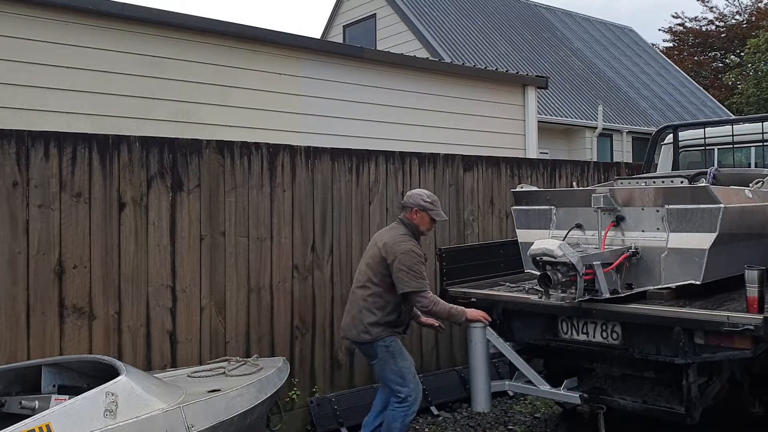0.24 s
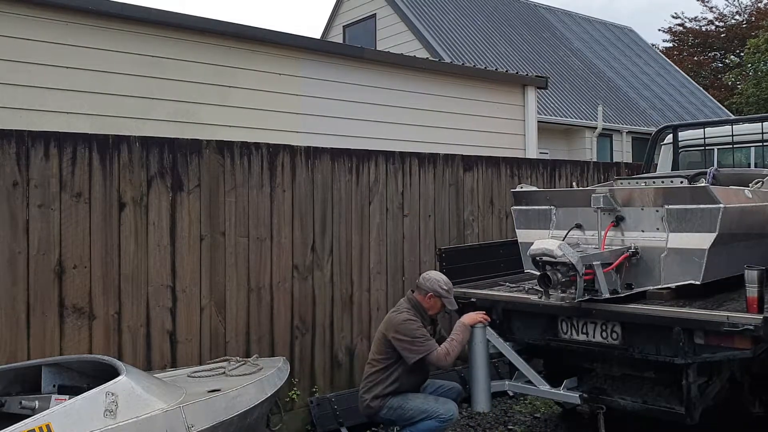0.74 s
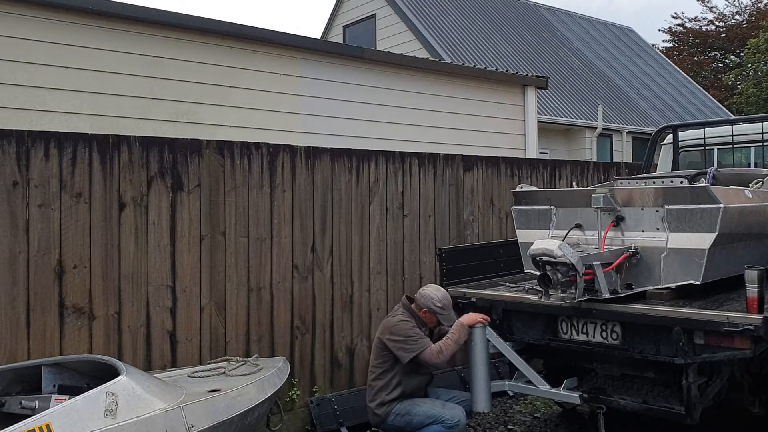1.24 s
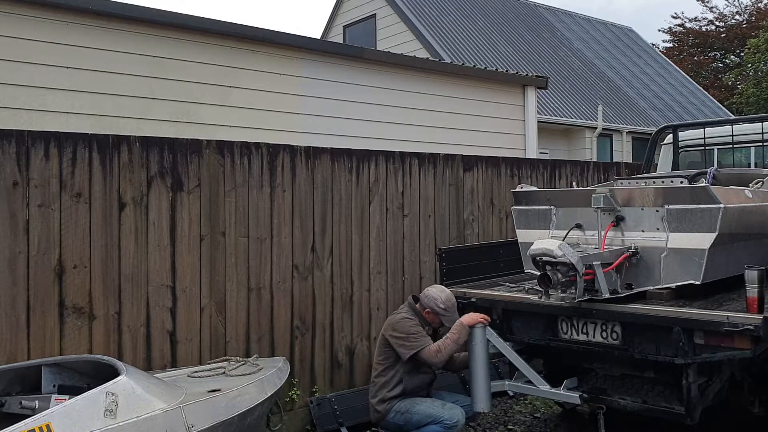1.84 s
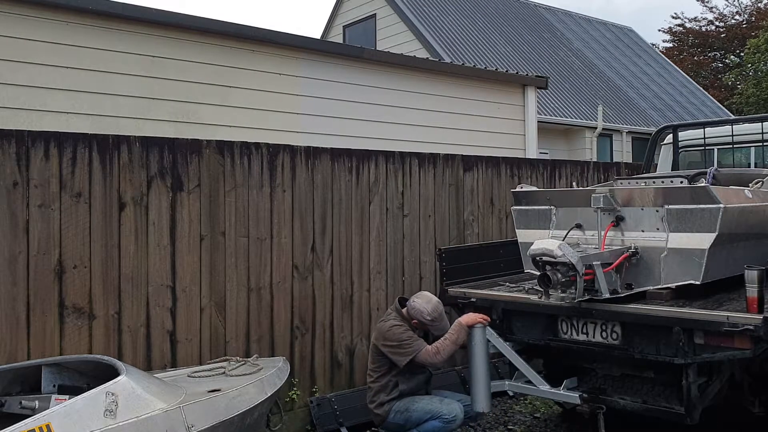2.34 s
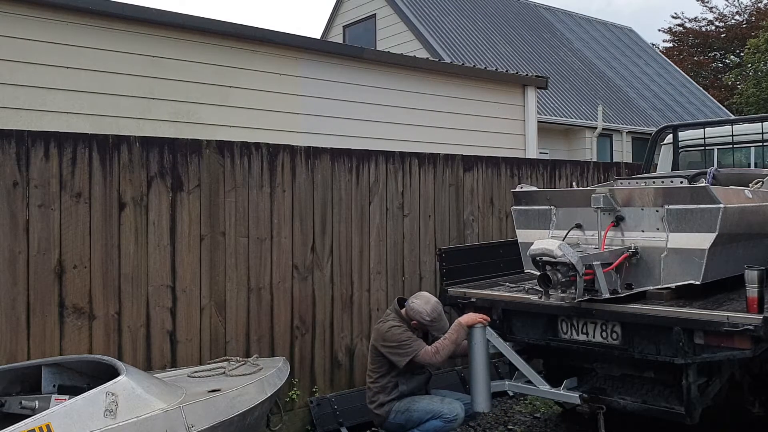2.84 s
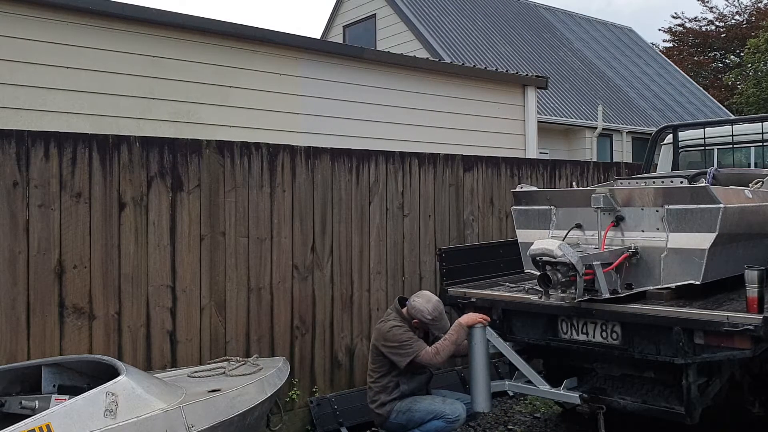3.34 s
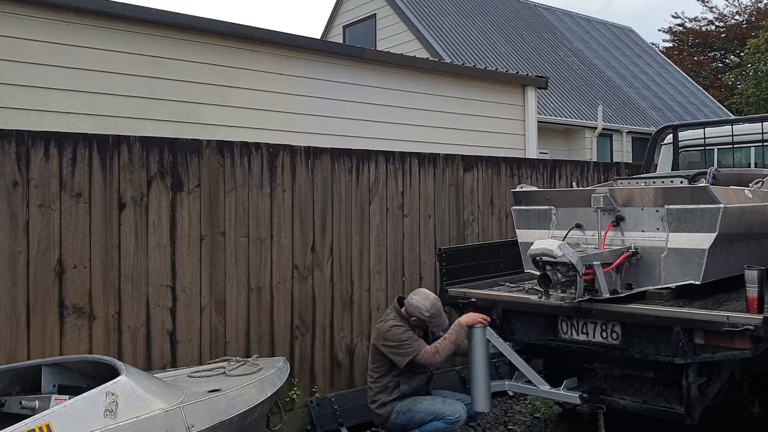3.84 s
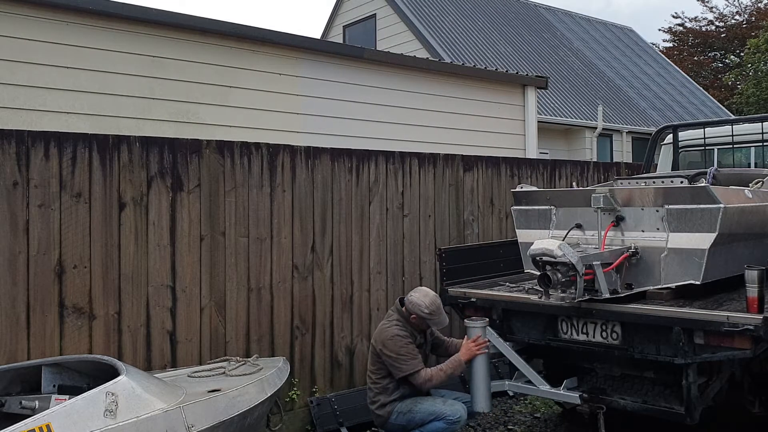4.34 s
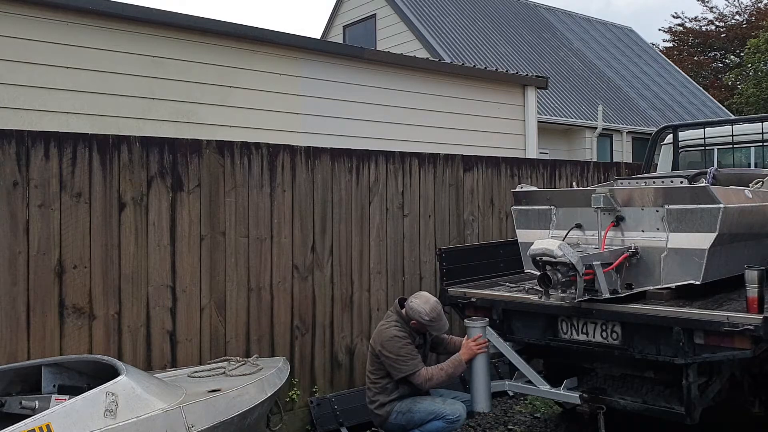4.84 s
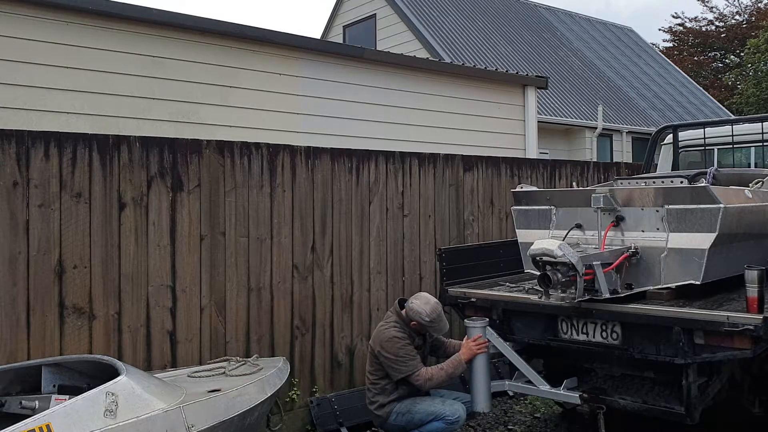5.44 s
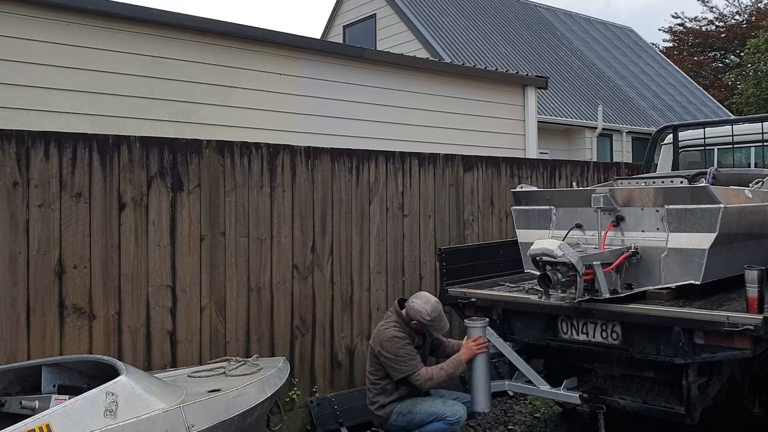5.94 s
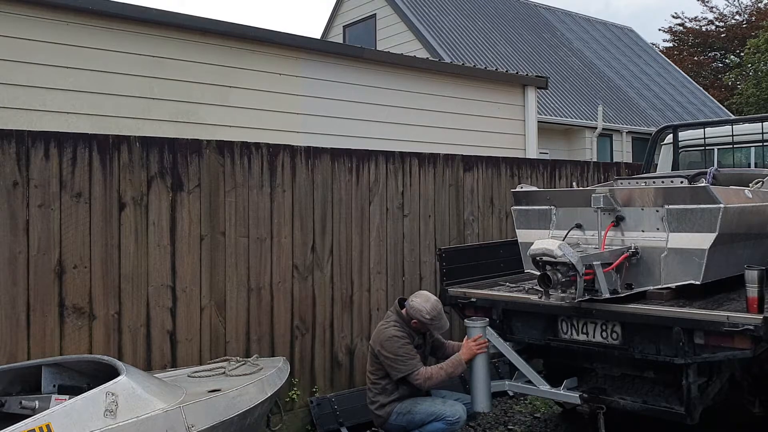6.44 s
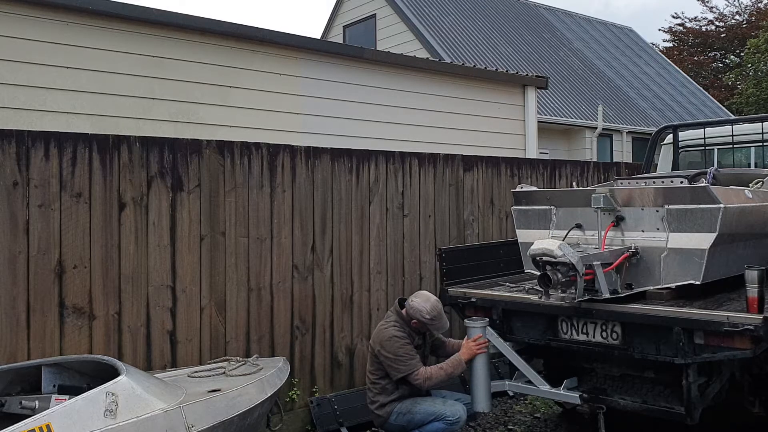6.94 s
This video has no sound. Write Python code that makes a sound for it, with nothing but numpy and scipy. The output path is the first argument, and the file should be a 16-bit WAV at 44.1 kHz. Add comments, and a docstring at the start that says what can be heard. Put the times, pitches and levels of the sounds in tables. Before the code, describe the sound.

Gravel crunches and small stones click as someone settles beside a steel post. Faint rubbing follows, then very short, high, glassy metal squeals, first irregular and spaced out, soon regular as the post is worked to and fro. Low muffled knocking and a little gritty scrape swell with each push. The microphone stands some metres away outdoors; fence and vehicle return quick echoes over soft low rumble.

```python
"""The dry joint of a home-built crane squeals in stick-slip as a man works its steel post to and fro by hand.
Squeals: chattering partials; judder: random knocks ringing post modes, plus scraping grit.
Clanks are damped sines, rubs narrow noise bands, sleeves and gravel coloured grains, footfalls damped noise.
Ground, a wooden fence and a truck throw the squeals back; a quiet outdoor rumble lies under it all."""
import sys
import numpy as np
from scipy import signal
from scipy.fft import rfft, irfft, next_fast_len
from scipy.io import wavfile
from scipy.ndimage import uniform_filter1d

SR = 44100
rng = np.random.default_rng(int(sys.argv[2]) if len(sys.argv) > 2 else 0)


def to_wav(s):
    """Save 16-bit WAV."""
    ch = np.atleast_2d(s).T  # columns
    pcm = np.round(np.clip(ch, -1, 1) * 32767)  # PCM
    wavfile.write(sys.argv[1], SR, pcm.astype(np.int16))


N = 317079
TIME = np.arange(N) / SR


def squeals(waver_hz=45, chatter_hz=160, flutter_db=4, rasp_db=-18, fall_db=7.0, overtone_pan=0.19):
    """Stick-slip locks to a steel resonance; where the grip is rough its pitch and strength chatter."""
    # joint bites and sings: t/s, length/s, build-up/s, f/Hz, glide/Hz, level/dB, roughness/0-1, overtone/dB
    bites = [ (1.671, 0.023, 0.01, 3020, 0, -28, 0.23, -19),
             (1.679, 0.016, 0.015, 6030, 200, -23, 0.22, -23.5),
             (1.687, .035, 0.011, 3733, 50, -12.5, 0.14, -16.5),
             (1.714, .05, 0.011, 3508, -77, -13.5, .2, -16),
             (1.86, 0.042, 0.011, 5653, 159.5, -20, 0.14, -16.5),
             (2.551, .024, .012, 5930, 0, -46, .2, -18.5),
             (2.571, 0.037, 0.013, 5890, -90, -15.5, 0.19, -8.5),
             (2.6, 0.055, .012, 6090, -170, -27.5, 0.78, -7.5),
             (3.228, 0.027, 0.018, 5870, -39, -18.5, 0.37, -11.5),
             (3.251, 0.024, 0.0081, 6060, 5.5, -9, .05, -16.5),
             (3.274, .068, .01, 5890, 138.5, -28.5, .5, -9),
             (3.787, 0.051, .016, 5894, 70.5, -22.5, 0.44, -3.5),
             (3.838, 0.049, 0.026, 5920, -400, -24, 0.06, -13),
             (4.476, 0.027, 0.019, 6080, -30, -30.5, 0.39, -19),
             (4.497, .076, 0.01, 5992, -170, -22, 0.26, -8.5),
             (5.018, 0.06, 0.032, 5923, -14.5, -21.5, 0.28, -13),
             (5.064, 0.035, .022, 5836, -28.5, -16.5, 0.15, -14),
             (5.092, 0.035, 0.012, 5556, -39.5, -26.5, 0.56, -8),
             (5.607, 0.063, .018, 5848, 149, -18, .22, -10),
             (5.665, 0.046, 0.02, 5826, 73.5, -19, 0.09, -8.5),
             (6.105, 0.073, .012, 5886, -79, -28, 0.5, -7),
             (6.129, 0.019, 0.0095, 5959, -37.5, -16.5, 0.37, -10.5),
             (6.657, 0.047, 0.025, 5838, -77.5, -17, 0.16, -13.5),
             (6.688, 0.059, 0.015, 5994, -130, -18.5, 0.19, -10),
             (7.157, 0.046, 0.022, 5806, 280, -26.5, 0.31, -10.5), ]
    # low and high steel resonances radiate to different sides: f/Hz, left minus right/dB
    radiation = [(3600, -8), (5900, 5.5)]
    # echoes off ground, truck and fence: delay/s, level/dB, left minus right/dB, lag of left port/ms
    reflections = [(.0031, -8.5, -1, .02), (.0083, -6, -0.5, .16), (0.0137, -9, 5, -.1),
                   (0.023, -16.5, -4, 0.069)]
    start_below_db, sag_db_per_s, release_s = 15.5, 127, 0.011

    slow, fast = wander(110), wander(410)
    flutter, rasp = np.tanh(wander(330)), wander(1100)
    out = np.zeros((2, N))
    for s, length_s, build_s, pitch_hz, glide_hz, level_db, rough, overtone_db in bites:
        grip = gate(s, length_s, open_s=0.0059, close_s=release_s)
        on = grip > 0
        age = TIME[on] - s

        hz = pitch_hz + glide_hz * age / length_s
        jitter_hz = rough * (waver_hz * slow[on] + chatter_hz * fast[on])
        phase = 2 * np.pi * np.cumsum(hz + jitter_hz) / SR

        db = level_db - start_below_db * np.maximum(1 - age / build_s, 0)
        db = db - sag_db_per_s * np.maximum(age - build_s, 0)
        strength = grip[on] * undb(db + flutter_db * rough * flutter[on])
        strength = strength * (1 + undb(rasp_db) * rough * rasp[on])

        # each slip is abrupt, which adds overtones; these spread more evenly to both sides
        overtones = 0
        for k in (2, 3, 4):
            gain = undb(overtone_db - fall_db * (k - 2) ** 2)
            overtones = overtones + (k * hz < SR / 2) * gain * np.sin(k * phase)
        pan_db = np.interp(pitch_hz, *np.transpose(radiation))
        tone = sides(pan_db) * np.sin(phase) + sides(overtone_pan * pan_db) * overtones
        out[:, on] += strength * tone

    direct = place(out, pan_db=5.0, lag_ms=0.062)
    echoes = 0
    for delay_s, db, pan_db, lag_ms in reflections:
        echoes = echoes + undb(db) * place(delay(direct, delay_s), pan_db, lag_ms)
    return yard(direct + echoes, near_db=-5.5, far_db=-19, near_t60=0.17, far_t60=0.46)


def judder(knock_rate_hz=190, scrape_trim_db=-2, dull_hz=1050, catch_db=3.5):
    """The loose post knocks rapidly in its sleeve and rings the frame, while grit scrapes between the tubes."""
    # resonances of post and frame: f/Hz, width/Hz, relative level/dB
    post = [(116.25, 13, 5), (209.5, 40, -4.5), (298.5, 24, -3), (345, 12, -7), (392, 17, -6),
            (500, 75, -20), (610, 49, -16), (726, 14, -16.5), (802, 18, -14.5), (931, 8.1, -15.5)]
    # colour of the scraping: f/Hz, relative level/dB
    scrape = [(500, -18.5), (1000, 0), (1300, -6), (2000, 1), (2700, -7), (3500, -3.5), (4000, -2),
              (4600, 1.5), (5200, -6), (7000, -8), (8500, -18.5), (16000, -21)]
    # pushes of the hands: full force at t/s, build-up/s, hold/s, deep sway/dB, frame rattle/dB,
    # scraping before trim/dB
    strokes = [ (1.655, 0.17, 0.062, -53, -58, -57.5), (1.811, 0.44, 0.074, -50.5, -48, -56),
               (2.04, .4, .05, -64, -68, -70), (2.612, 0.16, 0.061, -38.5, -41, -53.5),
               (3.21, .2, .02, -50, -50.5, -61), (3.306, .22, 0.011, -45, -46.5, -56.5),
               (3.808, .07, 0.057, -41, -42.5, -49), (4.505, .33, 0.025, -45, -47.5, -56.5),
               (5.094, 0.3, 0.067, -43, -49.5, -55.5), (5.621, 0.22, 0.069, -43.5, -47.5, -59),
               (6.169, 0.28, 0.04, -42, -44.5, -55.5), (6.678, 0.26, 0.056, -38.5, -46, -57.5),
               (7.19, 0.2, .06, -45.5, -52.5, -57), ]
    # scraping stops first, then the rattle; the sway comes late and lasts longest
    scrape_t60_s, rattle_t60_s, sway_t60_s, sway_lag_s = 0.33, 0.35, 0.64, 0.016

    low_pass = signal.butter(6, dull_hz, fs=SR, output="sos")
    knocks = signal.sosfilt(low_pass, impacts(knock_rate_hz, spread_db=0.5))
    modes = [(-1) ** k * undb(db) * resonate(knocks, hz, width_hz)
             for k, (hz, width_hz, db) in enumerate(post)]
    # two lowest modes: the whole post swaying
    sway, rattle = even(sum(modes[:2])), even(sum(modes[2:]))
    grit = unit(colour(impacts(1500, spread_db=1.5), scrape) * undb(catch_db * wander(60)))

    deep, frame, scrapes = 0, 0, 0
    for s, build_s, hold_s, sway_db, rattle_db, scrape_db in strokes:
        deep = deep + sway * swell(s + sway_lag_s, build_s, hold_s, sway_t60_s) * undb(sway_db)
        frame = frame + rattle * swell(s, build_s, hold_s, rattle_t60_s) * undb(rattle_db)
        scraping = swell(s, build_s, hold_s, scrape_t60_s) * undb(scrape_db + scrape_trim_db)
        scrapes = scrapes + grit * scraping

    # long waves reach both ports alike; short ones scatter
    deep = place(deep, pan_db=3.0)
    frame = yard(place(frame, pan_db=5.0, lag_ms=0.18), near_db=-6.0, far_db=-19.5)
    scrapes = yard(place(scrapes, pan_db=1), near_db=-0.5, far_db=-14.5)
    return deep + frame + scrapes


def clanks(rise_s=0.0054):
    """One mode of the hollow post swells and rings out under the damping hands."""
    # firm knocks that set the post humming: t/s, level/dB, f/Hz, t60/s
    hums = [(5.6, -58.5, 786, 0.5), (6.643, -38, 804, .22)]
    out = 0
    for s, db, hz, t60 in hums:
        age = np.maximum(TIME - s, 0)
        envelope = undb(db - 60 * age / t60) * (1 - np.exp(-age / rise_s))
        out = out + envelope * np.sin(2 * np.pi * hz * age)
    return place(out, pan_db=8.0)


def rub(catch_db=3.0, swell_db=12):
    """Light, uneven friction between bites only stirs narrow, gliding bands of the steel."""
    # t/s, length/s, start f/Hz, end f/Hz, width to each side/Hz, mid level/dB
    rubs = [ (.74, 0.32, 4860, 4650, 300, -66.5), (.74, .38, 2013, 2066, 190, -60),
            (.93, 0.37, 4550, 4250, 234, -59), (1.33, 0.12, 4270, 3970, 170, -63),
            (1.53, .09, 5600, 3800, 400, -74.5), (1.632, .045, 2760, 2700, 300, -57),
            (1.98, 0.14, 2950, 2750, 700, -69), (2.65, 0.099, 3470, 3476, 110, -58),
            (3.15, .13, 4640, 4700, 330, -68), (3.4, .27, 4930, 4780, 100, -73),
            (3.793, 0.043, 2094, 2036, 130, -49.5), (4.41, 0.084, 4550, 4500, 160, -66),
            (4.609, 0.089, 2445, 2400, 130, -73), (6.14, .2, 3890, 2587, 520, -62.5), ]
    out = 0
    for s, length_s, start_hz, end_hz, width_hz, level_db in rubs:
        progress = np.clip((TIME - s) / length_s, 0, 1)
        phase = 2 * np.pi * np.cumsum(start_hz + (end_hz - start_hz) * progress) / SR
        band = wander(width_hz) * np.sin(phase) + wander(width_hz) * np.cos(phase)
        # loudest in the middle
        db = level_db - swell_db * np.abs(2 * progress - 1)
        out = out + band * gate(s, length_s, open_s=0.017, close_s=0.017) * undb(db)
    out = out * undb(catch_db * wander(25))
    return yard(place(out, pan_db=-0.5), near_db=-9.5, far_db=-12.5)


def feet(gravel_trim_db=-3, click_s=0.0017):
    """Stones grind under the shoes; each footfall or kicked stone is a short damped thud with a click."""
    # colour of the gravel: f/Hz, relative level/dB
    gravel = [(180, -25.5), (300, -2), (409, -8.5), (637, -6.5), (1040, -15), (1520, -12), (3120, -18.5),
              (4770, -17.5), (9330, -24), (15000, -24.5)]
    # shoes scuff the gravel: peak t/s, level before trim/dB, build-up/s, t60/s
    scuffs = [(0.0, -57.5, .1, 0.63), (0.122, -42, 0.33, 0.61), (.3, -65, 0.068, 0.66),
              (0.443, -53, 0.02, .5), (0.559, -60, 0.11, 1.5), (.914, -54.5, 0.034, 0.18),
              (.99, -57.5, 0.78, 1.8)]
    # footfalls and kicked stones: t/s, thud/dB, click/dB, thud f/Hz, thud t60/s
    steps = [(0.052, -51.5, -45, 1850, 0.044), (0.09, -43, -39.5, 860, 0.14), (0.117, -30, -48, 490, 0.041),
             (0.189, -41.5, -58, 1760, 0.024), (0.302, -51, -52, 2080, 0.065),
             (0.386, -53.5, -51, 2500, 0.033), (0.438, -56, -47, 1430, 0.36),
             (0.485, -46.5, -57.5, 1860, 0.035), (0.516, -58, -46.5, 2950, 0.016),
             (.892, -60, -66, 2500, 0.023), (0.914, -43.5, -50, 1930, 0.047), (.953, -64.5, -68, 2500, .02),
             (1.013, -66, -70, 2200, 0.016), (2.812, -61, -67, 7040, 0.053)]

    scuffing = sum(undb(db + gravel_trim_db) * swell(s, build_s, 0, t60) for s, db, build_s, t60 in scuffs)
    out = unit(colour(impacts(1300, spread_db=1), gravel)) * scuffing
    for s, thud_db, click_db, hz, t60 in steps:
        age = np.maximum(TIME - s, 0)
        noise = rng.standard_normal(N)
        ringing = resonate(resonate(noise, hz, 0.25 * hz), hz, 3.0 * hz)
        thud = even(ringing, over_s=0.0053) * undb(-60 * age / t60)
        click = unit(resonate(noise, 5400, 5200)) * np.exp(-age / click_s)
        out += (TIME > s) * (undb(thud_db) * thud + undb(click_db) * click)
    return yard(place(out, pan_db=4), near_db=-3.5, far_db=-18.5)


def sleeves(hz=4200, width_hz=5000):
    """Sleeves brush as the hands change grip: cloth fibres catch and let go."""
    peak_s, level_db, build_s, t60_s = 4.2, -73.5, 0.7, 0.6
    rustle = unit(resonate(impacts(3800, spread_db=8), hz, width_hz))
    brush = swell(peak_s, build_s, 0, t60_s) * undb(level_db)
    return yard(place(rustle * brush, pan_db=7), near_db=-1.5, far_db=-32.0)


def air(level_db=-56, swell_db=3.0, apart_hz=900):
    """Distant rumble, mostly alike at both ports in the bass and unrelated in the treble."""
    # colour of the neighbourhood: f/Hz, relative level/dB
    rumble = [(20, -26.5), (45, 0.5), (85, 0.5), (170, -7.5), (300, -8), (500, -15), (780, -16.5),
              (1300, -33), (2700, -38.5), (4200, -45.5), (7500, -40.5), (8800, -54), (12500, -44),
              (15500, -47)]
    mid, side = rng.standard_normal((2, N))
    high_pass = signal.butter(1, apart_hz, "high", fs=SR, output="sos")
    side = signal.sosfilt(high_pass, side) + 0.45 * rng.standard_normal(N)
    both = colour(place(mid, pan_db=3.5, lag_ms=0) + np.array([side, -side]), rumble)
    return both / np.std(both.mean(axis=0)) * undb(level_db + swell_db * wander(6.8))


def yard(x, near_db, far_db, near_t60=0.17, far_t60=0.37):
    """Quick scatter from things close by, then a thin tail from the houses."""
    t = TIME[:SR]

    def tail(t60):
        """Decaying noise of unit mean energy per side."""
        noise = rng.standard_normal((2, SR)) * (1 - np.exp(-t / 0.0027))
        return unit(noise * undb(-60 * t / t60)) / np.sqrt(SR)

    response = undb(near_db) * tail(near_t60) + undb(far_db) * tail(far_t60)
    return x + signal.fftconvolve(x, response, axes=1)[:, :N]


def place(x, pan_db, lag_ms=0.06):
    """Two microphone ports; the sound reaches the left one lag_ms later (earlier if negative)."""
    left, right = np.broadcast_to(x, (2, N))
    return np.array([delay(left, lag_ms / 1000), right]) * sides(pan_db)


def sides(pan_db):
    """Left and right gains for a level difference, rms 1."""
    return unit(undb(np.array([[pan_db], [-pan_db]]) / 2))


def delay(x, s):
    """Shift a sound later by s seconds, as a phase slope."""
    size = next_fast_len(N + SR // 10)
    hz = np.arange(size // 2 + 1) * SR / size
    return irfft(rfft(x, size) * np.exp(-2j * np.pi * hz * s), size)[..., :N]


def impacts(rate_hz, spread_db):
    """Contacts at random moments with uneven force and random sign."""
    hit = rng.random(N) < rate_hz / SR
    force = undb(spread_db * np.clip(rng.standard_normal(N), -2, 2))
    return hit * rng.choice([-1, 1], N) * force


def resonate(x, hz, width_hz):
    """One resonance, gain 1 at its centre."""
    return signal.lfilter(*signal.iirpeak(hz, hz / width_hz, fs=SR), x)


def colour(x, points):
    """Shape a spectrum by f/Hz, level/dB points, joined over log frequency."""
    hz, db = np.transpose(points)
    size = next_fast_len(N + SR // 10)
    f = np.maximum(np.arange(size // 2 + 1) * SR / size, 1)
    gain = undb(np.interp(np.log(f), np.log(hz), db))
    return irfft(rfft(x, size) * gain, size)[..., :N]


def wander(hz):
    """Random motion of rms 1, low-passed at hz."""
    low_pass = signal.butter(3, hz, fs=SR, output="sos")
    return unit(signal.sosfilt(low_pass, rng.standard_normal(N)))


def gate(s, length_s, open_s, close_s):
    """Open from s for length_s; rounded edges are half open at both ends."""
    inside = np.minimum((TIME - s) / open_s, (s + length_s - TIME) / close_s)
    return np.sin(np.pi / 2 * np.clip(0.5 + inside, 0, 1)) ** 2


def swell(s, build_s, hold_s, t60):
    """Grow by 60 dB in build_s to full level at s, hold, then die away; floor at -120 dB."""
    below = np.maximum(s - TIME, 0) / build_s + np.maximum(TIME - s - hold_s, 0) / t60
    return np.exp(-np.log(1000) * np.clip(below, 0, 2))


def even(x, over_s=0.049):
    """Scale to about rms 1 over every short stretch, keeping the grain."""
    local_power = uniform_filter1d(x ** 2, int(over_s * SR) + 1)
    return x / np.sqrt(local_power + np.mean(x ** 2) / 1000)


def unit(x):
    """Scale to rms 1."""
    return x / np.sqrt(np.mean(x ** 2))


def undb(db):
    """Decibels to gain."""
    return 10 ** (np.asarray(db) / 20)


def scene():
    """Everything in the yard."""
    return squeals() + judder() + clanks() + rub() + feet() + sleeves() + air()


def record(dry, top_hz=15400):
    """Cut the top with a steep elliptic low-pass."""
    low_pass = signal.ellip(10, 0.2, 80, top_hz, fs=SR, output="sos")
    return signal.sosfilt(low_pass, dry)


dry = scene()
out = record(dry)
to_wav(out)
```